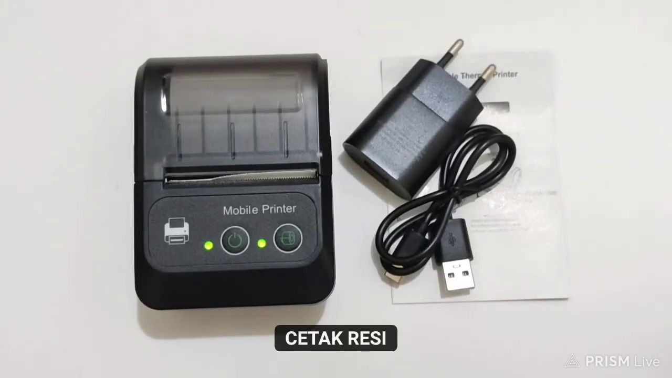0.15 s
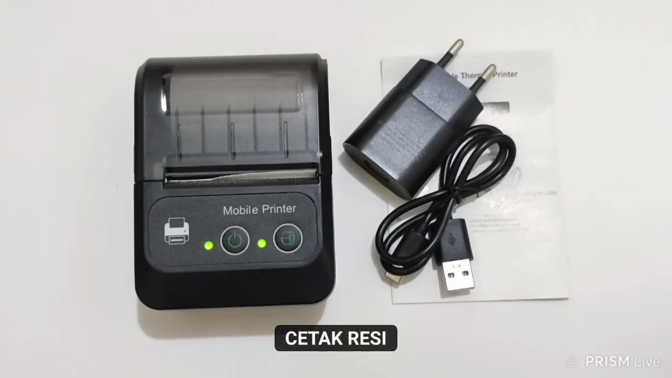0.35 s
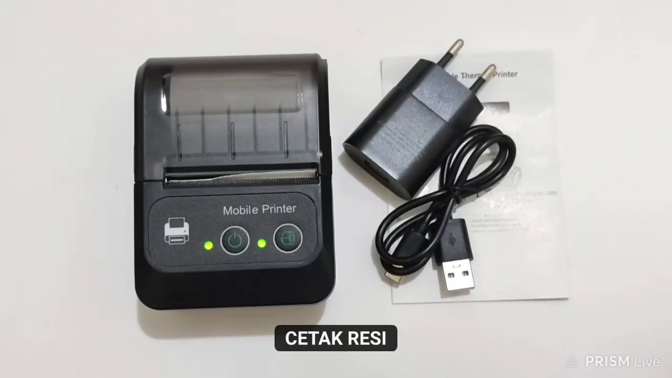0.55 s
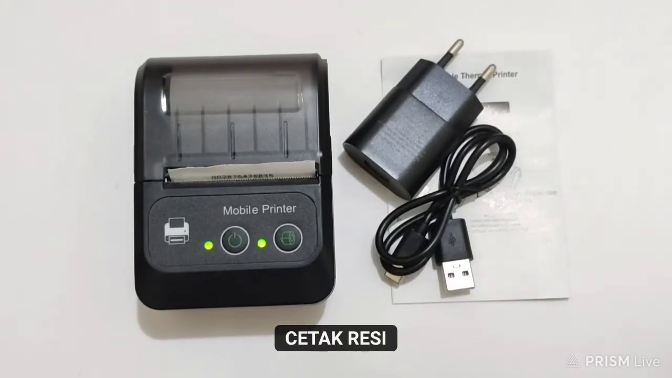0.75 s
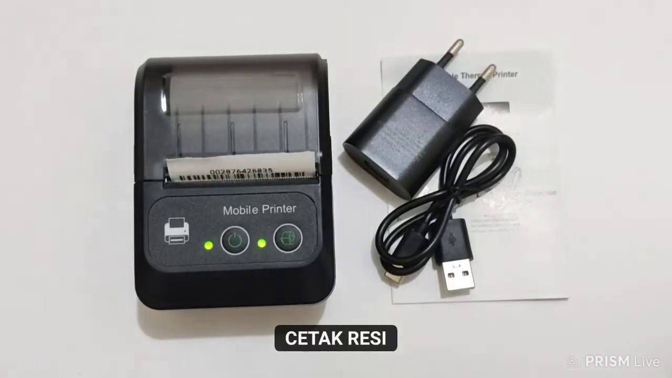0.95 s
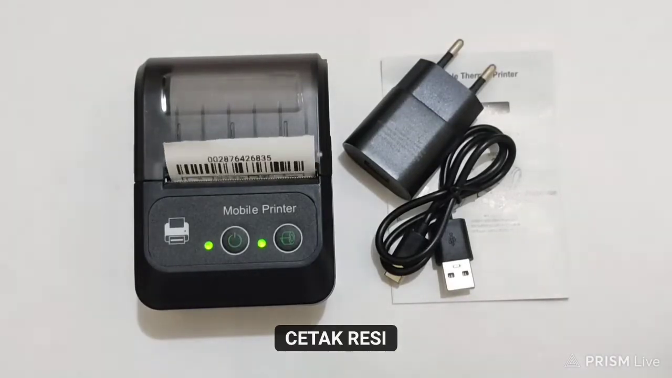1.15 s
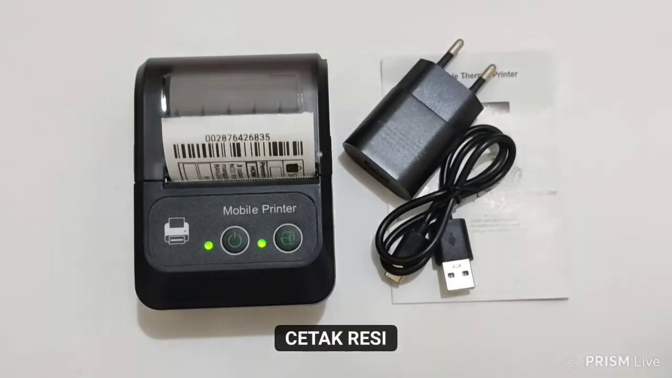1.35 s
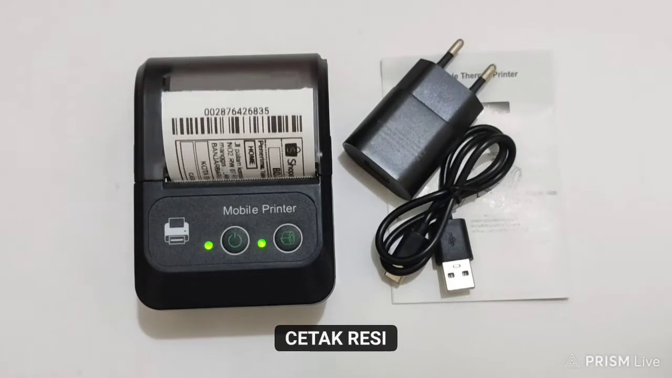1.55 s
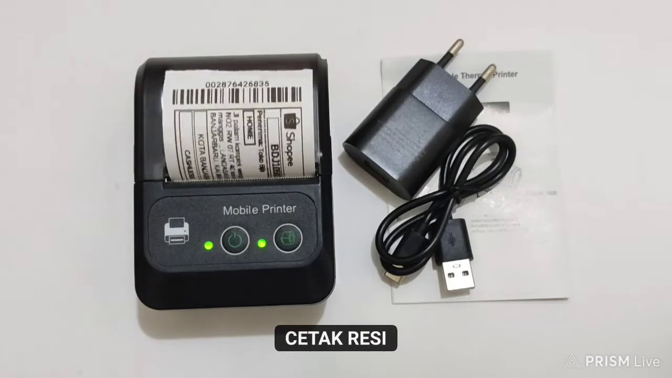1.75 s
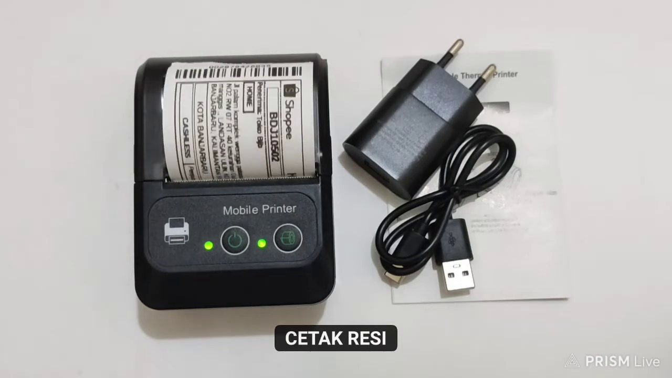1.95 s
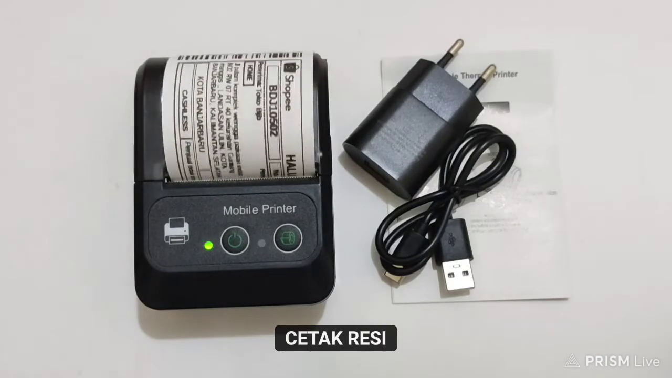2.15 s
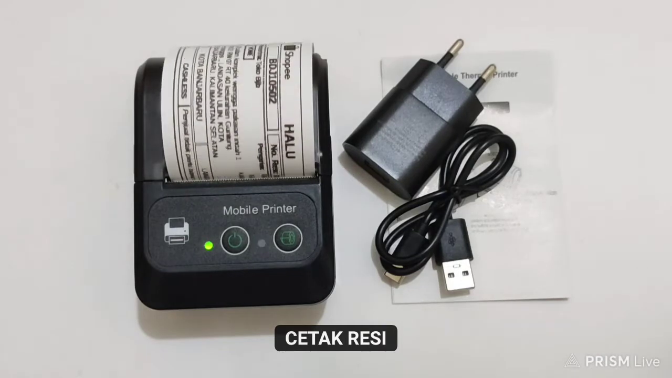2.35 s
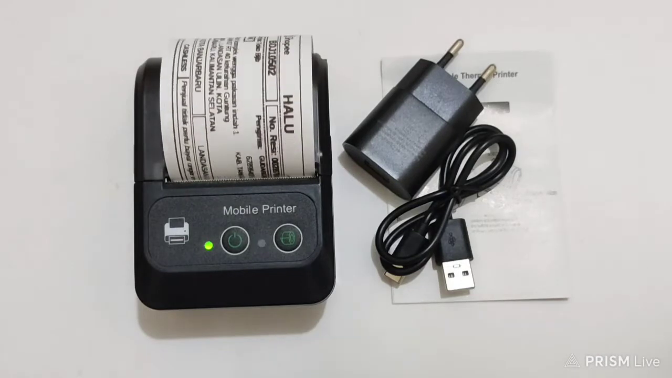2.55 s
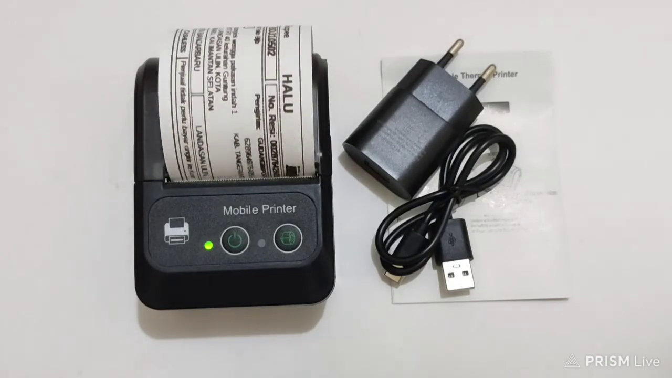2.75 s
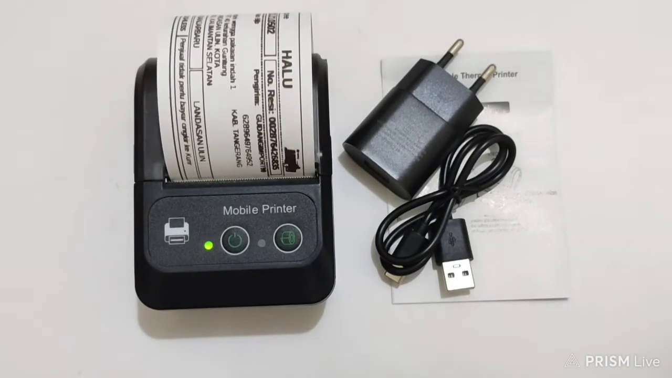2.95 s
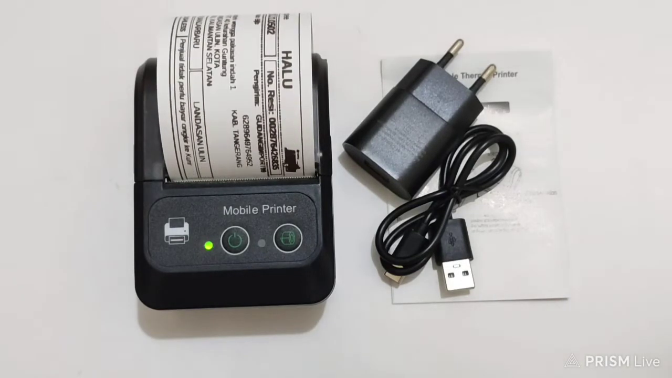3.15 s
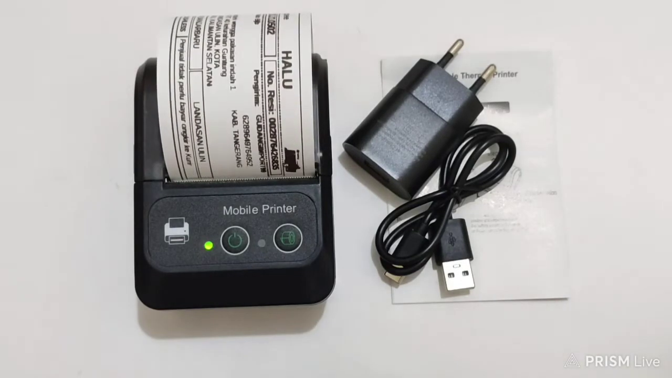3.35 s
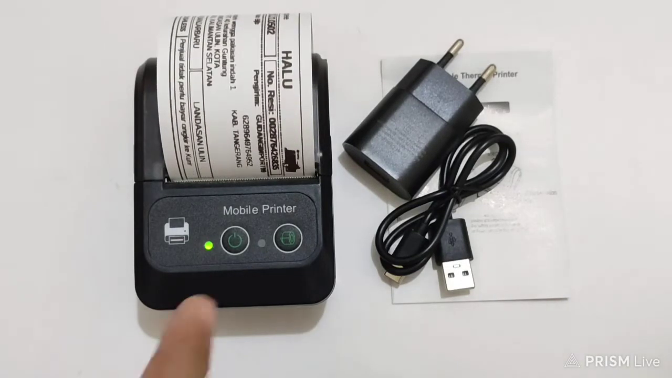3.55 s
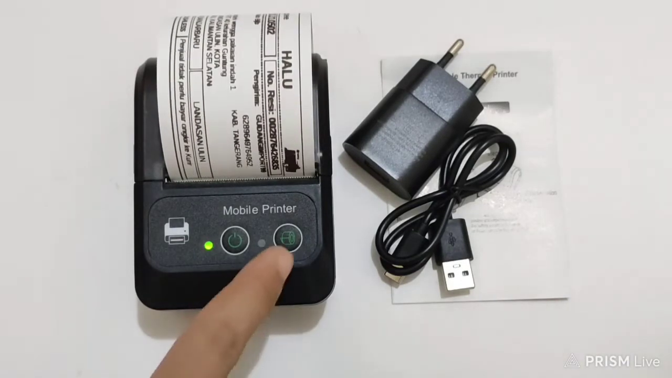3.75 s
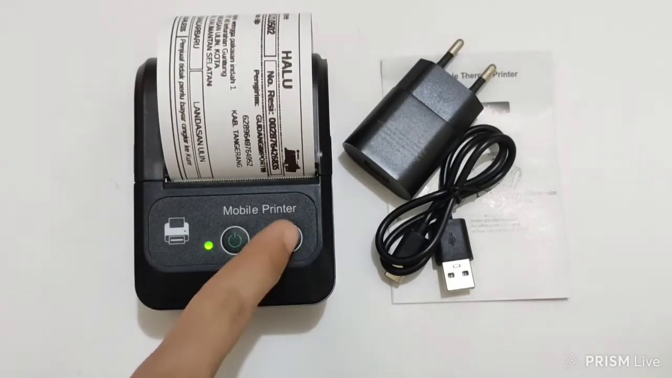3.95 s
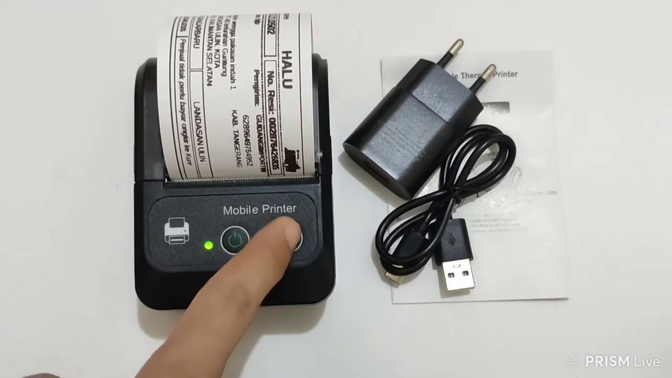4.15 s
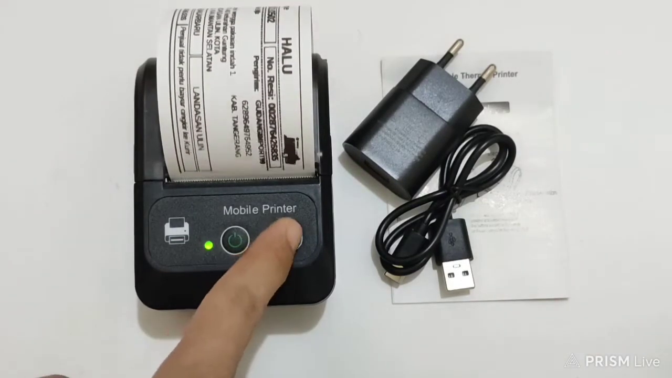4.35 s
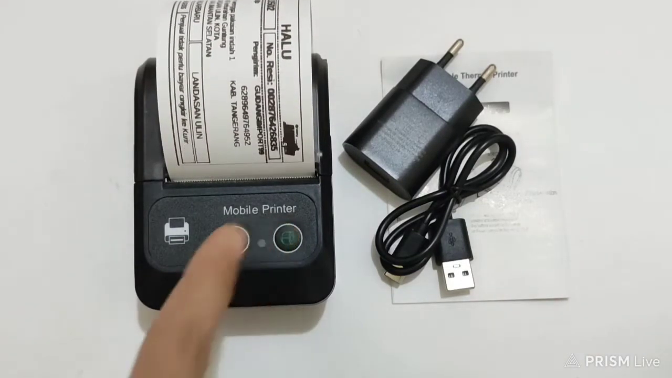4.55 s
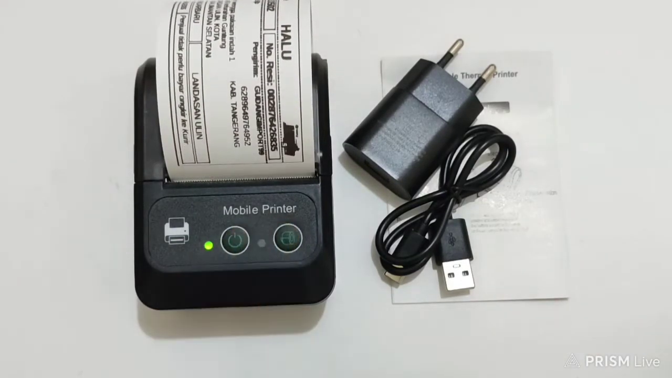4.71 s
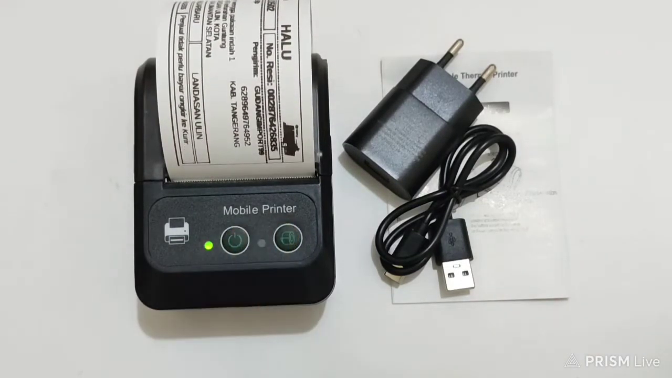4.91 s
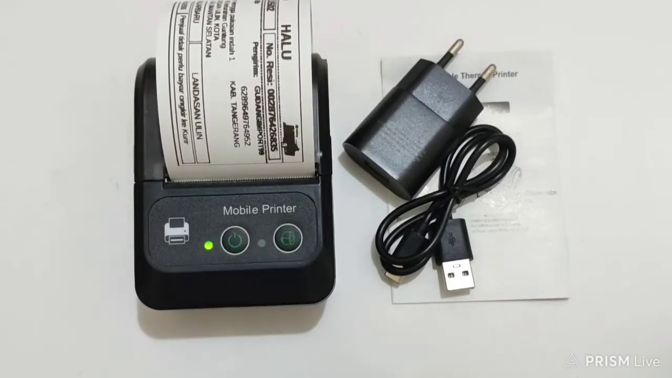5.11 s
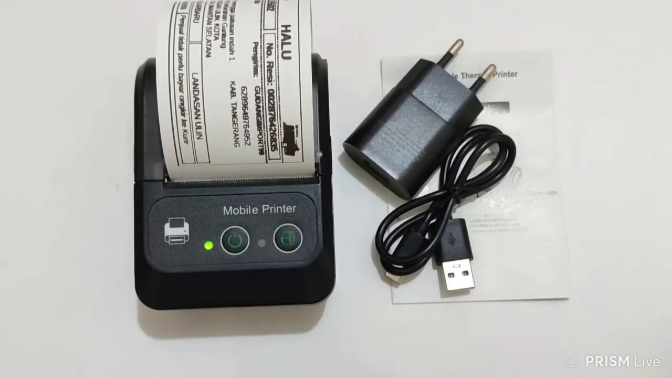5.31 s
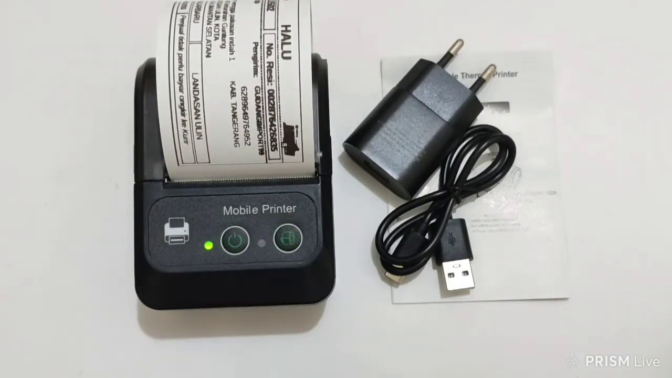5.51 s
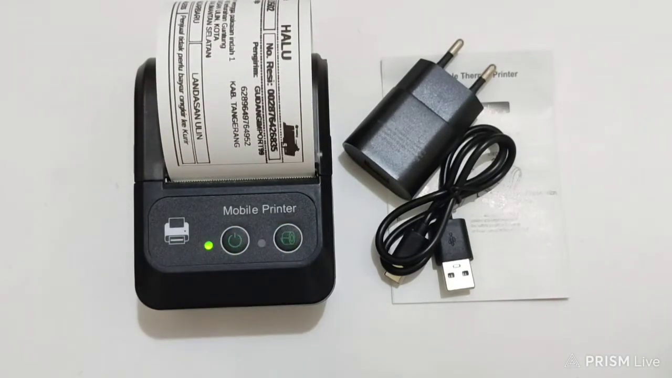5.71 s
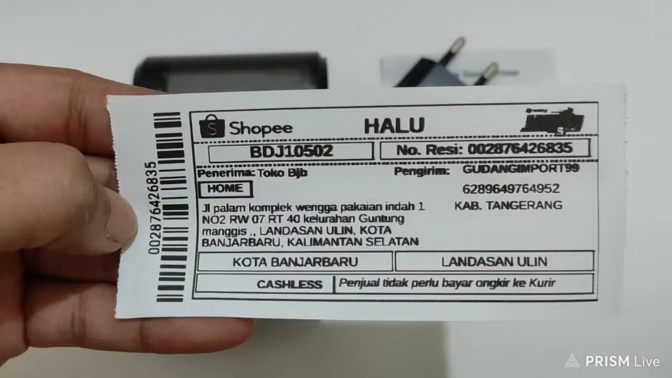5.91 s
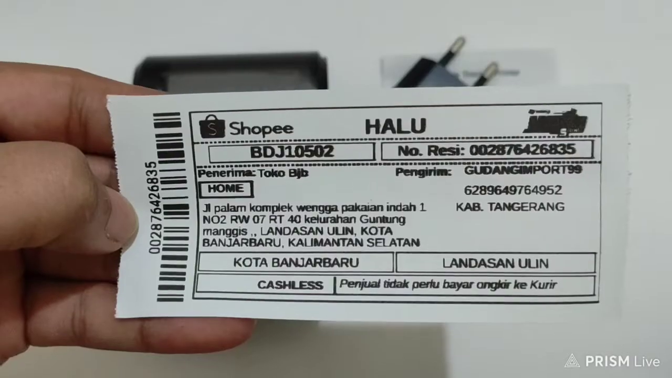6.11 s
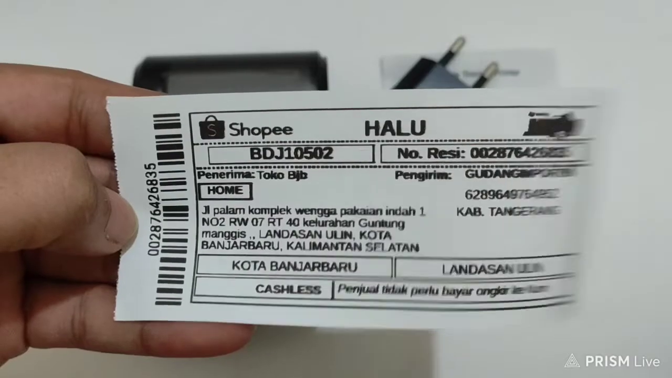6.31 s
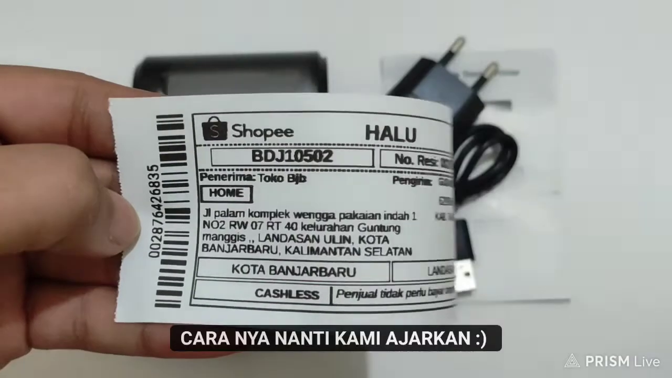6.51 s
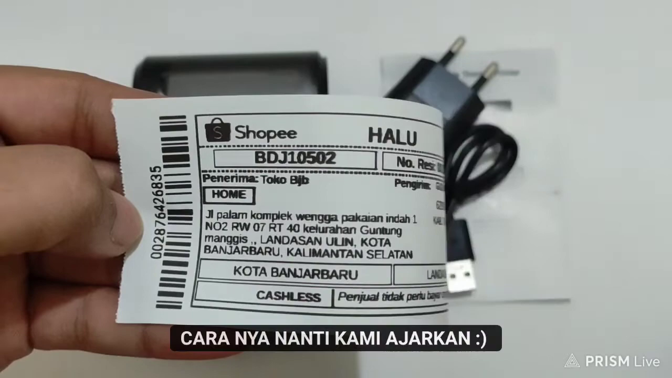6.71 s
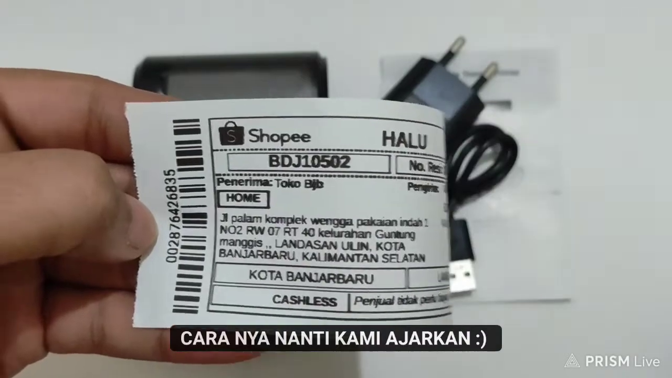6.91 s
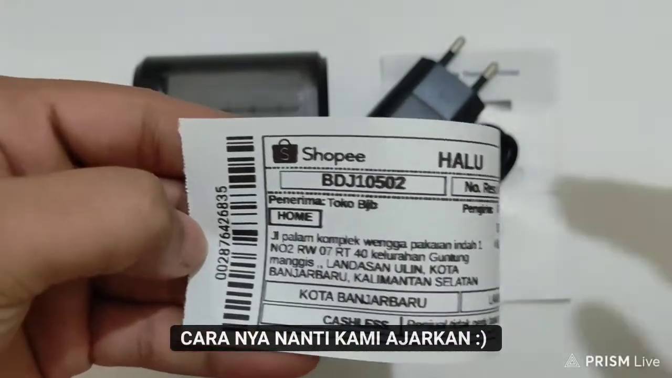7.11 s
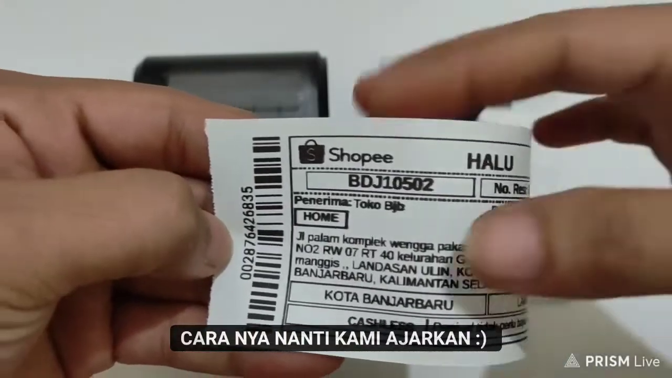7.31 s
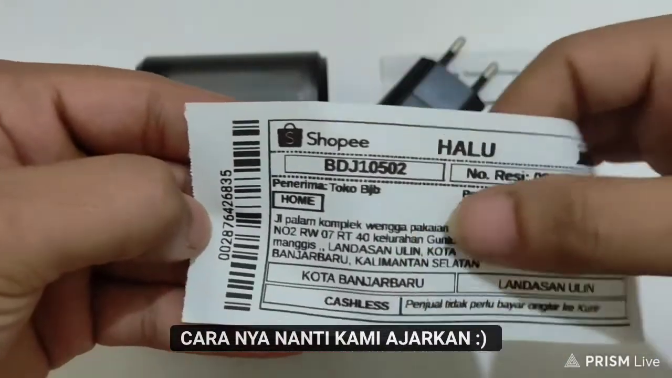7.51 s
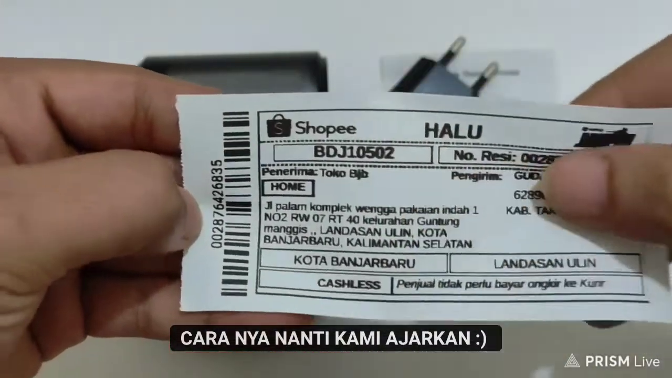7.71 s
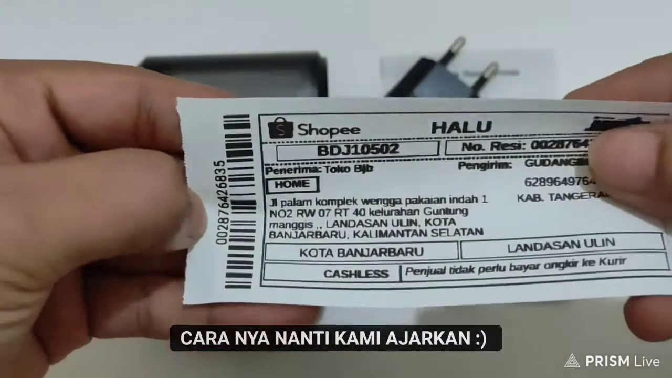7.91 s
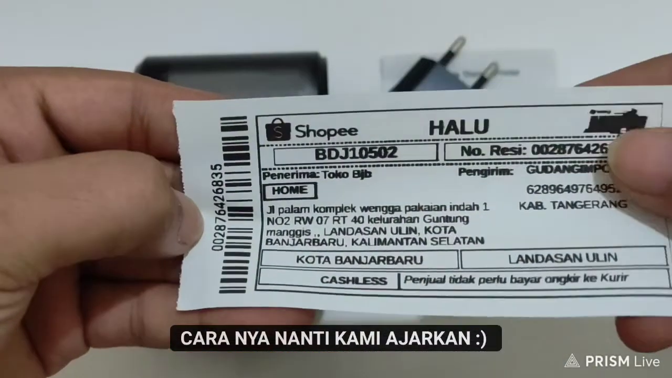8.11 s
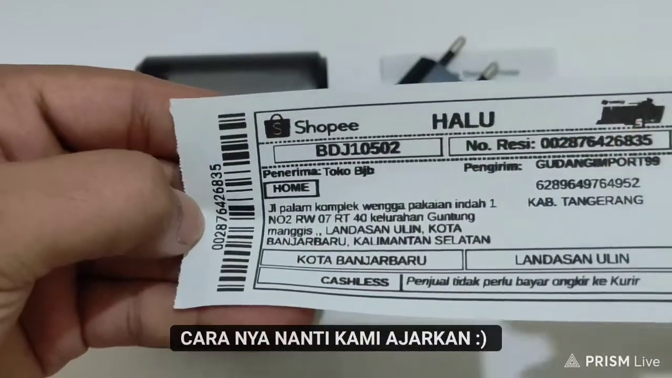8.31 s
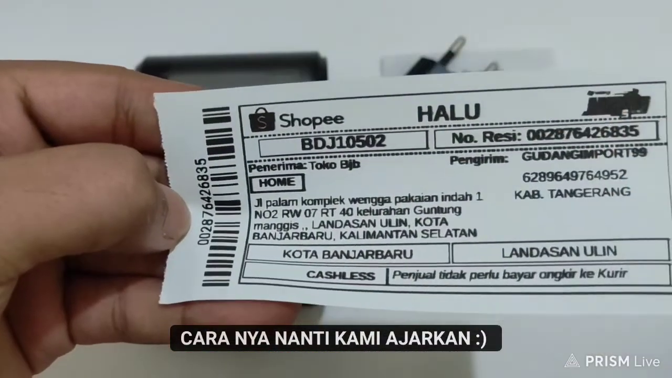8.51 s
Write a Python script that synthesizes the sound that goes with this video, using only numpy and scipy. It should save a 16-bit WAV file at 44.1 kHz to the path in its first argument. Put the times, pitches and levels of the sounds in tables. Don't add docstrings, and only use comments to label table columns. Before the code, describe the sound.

A small thermal printer clacks and buzzes out a paper label, its button clicks a brief feed, then paper rustles and snaps taut sharply.

```python
import sys
import numpy as np
from scipy import signal
from scipy.fft import rfft, irfft, next_fast_len
from scipy.io import wavfile
from scipy.ndimage import uniform_filter1d, map_coordinates

SR = 44100
rng = np.random.default_rng(int(sys.argv[2]) if len(sys.argv) > 2 else 0)


def digitize_waveform(pressure):
    field = np.atleast_2d(pressure).T
    bounded = np.clip(field, -1, 1)
    quanta = np.round(bounded * 32767).astype(np.int16)
    wavfile.write(sys.argv[1], SR, quanta)


def attenuation_scalar(level_db):
    decades = np.asarray(level_db, float) / 20
    return 10 ** decades


N = 381856

# start_s, pace_steps_per_s, unevenness_0_to_1
STRETCHES = [(.64, 80, .001), (1.055, 203, .009), (1.18, 167, .025), (1.345, 238, .2), (1.71, 258, .06),
             (1.78, 241, .02), (2.052, 222, .03), (2.095, 243, .021), (2.59, 178, .06), (2.7, 212, .07),
             (2.775, 243, .014), (2.885, 249, .005), (4.2, 205, .05), (4.345, 250, .012)]
# start_s, rise_s, hold_s, hum_db
RUNS = [
    (.66, 0.0088, 2.284, -51),
    (4.31, 0.018, 0.13, -50.5),
]
# start_s, hum_db, gear_db, hiss_db, t60_s
JERKS = [
    (0.647, -83, -42, -34, 0.07),
    (.668, -56, -52, -57, 0.14),
    (.704, -30.5, -57, -25.5, 0.041),
    (1.043, -70, -45, -50, 0.15),
    (2.06, -45, -64, -64, 0.13),
    (2.93, -46, -74, -81, 0.29),
    (4.475, -40.5, -43.5, -70, 0.098),
]
# centre_hz, width_hz, level_db
SHELL_MODES = [(240, 60, -12), (325, 70, -4), (485, 60, -2.5), (565, 60, 2), (735, 110, 1), (1000, 160, -5),
               (1240, 160, -6.5), (1480, 200, -7), (1750, 120, -9), (1965, 120, -10)]
# centre_hz, width_hz, level_db
GEAR_MODES = [(2520, 590, 3.5), (2780, 210, 3.5), (3920, 150, 4), (4560, 200, -2), (4860, 130, 1),
              (5850, 300, 0), (5480, 300, -1), (6640, 450, -10)]
# freq_hz, level_db_per_hz
RUMBLE = [(120, -36), (250, -40), (500, -9.5), (800, -10), (1600, -12), (2200, -13.5), (2800, -10),
          (4500, -16), (6000, -23), (7500, -32), (10000, -86)]
# freq_hz, level_db_per_hz
HISS = [(3530, -18), (6000, -7), (7070, -17.5), (7710, -17), (8750, -7), (9540, -7), (12100, -9),
        (14300, -23), (16000, -7.5)]
# start_s, end_s, centre_hz, width_hz, gain_db
RINGS = [(.6, 1.07, 560, 40, 4), (.6, 1.07, 320, 30, 3), (1.17, 1.34, 500, 40, 4),
         (1.17, 1.34, 670, 50, -4), (1.8, 2.6, 487, 30, 3), (.75, 1.5, 3250, 300, 4),
         (.6, 1.1, 1200, 350, 3), (1.07, 1.17, 640, 90, 1), (.6, 1.1, 740, 90, -5), (2.8, 3.0, 248, 30, 6),
         (1.7, 2.4, 3880, 60, 4), (1.6, 2.1, 4560, 250, 3), (2.0, 2.55, 2830, 35, 7),
         (2.1, 2.62, 2700, 40, 5), (2.6, 3.0, 2560, 60, 5), (1.8, 3.0, 1960, 35, 5),
         (2.75, 3.0, 4540, 170, 4), (1.9, 3.0, 5690, 90, 3), (2.12, 2.6, 735, 70, 2),
         (4.2, 4.6, 750, 50, -2), (4.3, 4.5, 2720, 120, 4), (4.3, 4.5, 1260, 60, 3)]
# time_s, centre_hz, width_hz, depth_db
SHADE = [(.9, 3100, 500, 6), (1.3, 2740, 550, 22), (1.551, 2650, 450, 30), (1.8, 2520, 300, 27),
         (2.2, 2280, 200, 15), (2.5, 2240, 180, 16), (2.9, 2100, 150, -3), (4.3, 2400, 300, 4)]
# start_s, thud_peak_db, crack_db, t60_s
KNOCKS = [(0.648, -46, 9.5, 0.025), (0.661, -38.5, -7, 0.018), (0.674, -42, -17, 0.012),
          (0.681, -27, -1.5, 0.017), (0.694, -39, -10, 0.011), (0.697, -34, -9, 0.01),
          (0.704, -22, 2, 0.02), (0.724, -58, -7, 0.016), (0.74, -32, -22, 0.02),
          (2.942, -35.5, -10, 0.035), (4.247, -34, -5, 0.02), (4.257, -41.5, -8, 0.023),
          (4.283, -45, -12, 0.03), (4.316, -41, -5, 0.027), (4.475, -29.5, -22, 0.029),
          (4.489, -40, -8, 0.016)]
# centre_hz, width_hz, level_db
LID_MODES = [(622, 83, 4.5), (797, 114, 9), (1176, 95, 7), (1357, 105, 3.5), (1990, 220, -3.5)]
# freq_hz, level_db_per_hz
CLICK = [(900, -39), (1800, -19), (2600, 5), (3300, 8.5), (4000, 5.5), (5800, -2.5), (8000, -1),
         (11000, -7), (14000, -9), (16000, -7.5)]
# start_s, rise_s, hold_s, level_db
CREEPS = [
    (3.03, 0.12, 0.15, -66),
    (3.42, 0.059, .1, -88),
    (3.58, 0.017, .03, -75.5),
    (3.73, .036, .002, -86),
]
# freq_hz, level_db_per_hz
CREEP_RUSTLE = [(710, -18), (1200, 3), (1250, -5), (1500, 2), (1890, -8), (3490, -2.5), (6650, -8),
                (7230, -22), (8660, -4), (15000, -14)]
# start_s, start_hz, level_db
SQUEAKS = [
    (3.612, 10900, -66),
    (3.64, 10200, -80),
    (3.666, 11000, -69),
    (3.7, 10600, -67),
    (3.765, 10300, -76),
]
# start_s, thud_peak_db, crack_db, t60_s
BUMP = [
    (6.302, -38.5, -30, 0.03),
    (6.312, -43.5, -16.5, 0.04),
    (6.322, -52, -14, 0.027),
]
# centre_hz, width_hz, level_db
DESK_MODES = [(250, 100, 0), (614, 140, 5), (800, 96, 9), (1570, 310, -0.5), (2330, 200, -4.5),
              (3460, 300, -5)]
# start_s, thud_peak_db, crack_db, t60_s
FLICKS = [(7.364, -42.5, -13.5, 0.014), (7.371, -51, 0, 0.021), (7.391, -48, 1, 0.018),
          (7.399, -52, 4, 0.02), (7.41, -38, -7, 0.016), (7.446, -44, -25, 0.02), (7.449, -38, -25, 0.018),
          (7.4556, -46, -6, 0.01), (7.581, -42, 8.5, 0.008), (7.521, -49, 8, .005), (7.547, -48.5, 6, .005),
          (7.566, -48, 6.5, .005), (7.586, -31, 0.5, 0.019), (7.595, -45, -9.5, 0.013),
          (7.61, -30, -19, 0.023), (7.621, -37.5, -9, 0.018), (7.897, -48, -5, 0.01),
          (7.911, -45, -20, 0.01), (7.951, -59, -11, 0.016), (7.992, -43, -8, 0.012),
          (8.007, -50, -13, 0.012), (8.077, -45, -25, 0.017), (8.154, -44.5, -30.5, 0.034),
          (8.163, -54, -29, 0.02)]
# centre_hz, width_hz, level_db
SLACK_MODES = [(313, 140, 7.5), (640, 450, 6.5), (960, 360, 4), (1640, 370, -4.5)]
# start_s, thud_peak_db, crack_db, t60_s
PULL = [
    (7.7555, -35, -16, .05),
    (7.7598, -24, -10, .008),
    (7.7609, -7, -8, .01),
    (7.7622, -20, 5, .012),
    (7.7662, -20, -12, .012),
]
# centre_hz, width_hz, level_db
TAUT_MODES = [(850, 810, -3.5), (1960, 470, -7.5), (300, 44, -14)]
# freq_hz, level_db_per_hz
SNAP = [(900, -26), (2000, -3.5), (3000, -1), (4500, -7.5), (6000, -1.5), (8000, -11), (10500, -7),
        (13500, -28), (16000, -48)]
# start_s, rise_s, hold_s, rasp_db, flap_over_rasp_db
STROKES = [
    (7.355, 0.051, .005, -51.5, -4),
    (7.388, .004, .05, -55.5, -10),
    (7.451, .004, .04, -45.5, -12),
    (7.472, 0.041, 0.051, -46, -10.5),
    (7.57, 0.0074, 0.034, -52, 1.5),
    (7.652, 0.03, 0.044, -76, 8.5),
    (7.719, 0.028, .01, -56.5, -13.5),
    (7.896, 0.025, 0.035, -71, 0.5),
    (7.977, 0.013, 0.0052, -60.5, -1.5),
    (8.029, 0.032, .005, -61.5, -5.5),
]
# freq_hz, level_db_per_hz
RASP = [(470, -37.5), (800, -6), (1260, -15), (1720, -0.5), (1880, -1.5), (2050, -7.5), (2730, -4.5),
        (6570, -2), (7170, -8.5), (11000, -1.5), (16000, -12.5)]
# freq_hz, level_db_per_hz
FLAP = [(59, -37.5), (100, -10), (378, -1), (479, -8), (811, -9.5), (2000, -20.5), (2600, -59),
        (4400, -120)]
# freq_hz, left_minus_right_db
PORTS = [(100, 2.5), (400, 1), (700, 0.5), (1850, 0.5), (2300, 1), (3250, 2.5), (4000, 5), (4800, 2.5),
         (5800, 2), (7000, 7.5), (8500, 16), (10300, -10), (12400, -10.5), (15000, 4.5)]
# freq_hz, t60_s
WALLS = [(200, 0.4), (1000, 0.36), (5000, 0.41), (12000, 0.37)]
# freq_hz, level_db_per_hz
AIR = [(12, -72), (20, -47.5), (48, -14), (86, -6), (123, -2.5), (187, -5), (293, -7), (434, -9.5),
       (472, -13), (624, -13), (1960, -25), (3250, -27.5), (7520, -34.5), (14700, -33), (16000, -19.5)]
# freq_hz, left_right_likeness
AIR_ALIKE = [(60, 0.51), (240, 0.2), (950, 0.03), (3770, 0.013), (15000, -0.13)]
# freq_hz, left_minus_right_db
AIR_TILT = [(60, 2.5), (380, 1), (2380, 0.5), (15000, 0.0)]


def unit(x):
    return x / np.sqrt(np.mean(x ** 2) + 1e-20)


def along(points, hz):
    f, v = np.transpose(points)
    return np.interp(np.log(hz + 1), np.log(f + 1), v)


def wobble(rate):
    coarse = np.arange(0, N + 8, 8)
    knots = rng.standard_normal(int(N * rate / SR) + 4)
    return np.interp(np.arange(N), coarse, map_coordinates(knots, [coarse * rate / SR]))


def filtered(x, response):
    m = next_fast_len(N + SR // 4)
    return irfft(rfft(x, m) * response(np.fft.rfftfreq(m, 1 / SR)), m)[..., :N]


def tinted(x, spectrum):
    return unit(filtered(x, lambda hz: attenuation_scalar(along(spectrum, hz))))


def body(modes):
    def response(f):
        return sum((-1) ** k * attenuation_scalar(db) * 1j * f * w / (c * c - f * f + 1j * f * w)
                   for k, (c, w, db) in enumerate(modes))
    return response


def swells(rows, fall_db_per_s):
    rise_db = 20.5
    t, power = np.arange(N) / SR, np.zeros(N)
    for s, rise, hold, db in rows:
        a = round(s * SR)
        u = t[a:a + 3 * SR] - s
        rising = rise_db * np.clip(1 - u / rise, 0, 1)
        falling = fall_db_per_s * np.maximum(u - rise - hold, 0)
        power[a:a + 3 * SR] += attenuation_scalar(2 * (db - rising - falling))
    return np.sqrt(power)


def reshaped(x, gain_db):
    end = 5 * SR
    hz, t, z = signal.stft(x[..., :end], SR, nperseg=2048)
    head = signal.istft(z * attenuation_scalar(gain_db(hz[:, None], t)), SR, nperseg=2048)[1][..., :end]
    return np.concatenate([head, x[..., end:]], axis=-1)


def schedule():
    glide_s = .03
    s, *cols = np.transpose(STRETCHES)
    now = np.maximum(np.searchsorted(s, np.arange(N) / SR) - 1, 0)
    return [uniform_filter1d(c[now], round(glide_s * SR)) for c in cols]


def drive(pace, uneven):
    inertia_s, full_pace = .07, 240
    crawl_octaves = -0.57
    lag = lambda v: uniform_filter1d(v, round(inertia_s * SR))
    octaves = lag(np.log2(pace / full_pace))
    loss_db = 2.5 * lag(uneven)
    on = swells(RUNS, fall_db_per_s=800)
    short = np.exp(-np.cumsum(pace * (on > 0)) / SR / 110)
    rubbing = np.maximum(octaves, crawl_octaves)
    laws = [0.95 * octaves - loss_db / 2,
            3 + 11 * rubbing - loss_db - 6 * short,
            -2.5 + 6.5 * rubbing - loss_db / 2 - 3 * short]
    power, t = (on * attenuation_scalar(laws)) ** 2, np.arange(SR // 4) / SR
    for s, *dbs, t60 in JERKS:
        fading = attenuation_scalar(2 * (np.array(dbs)[:, None] - 60 * t / t60))
        power[:, round(s * SR):][:, :len(t)] += fading * np.minimum(t / 0.015, 1)
    return np.sqrt(power)


def ringing(hz, t):
    return sum(db * np.exp(-((hz - c) / w) ** 2) * np.clip(np.minimum(t - a, b - t) / .1 + .5, 0, 1)
               for a, b, c, w, db in RINGS)


def squeal():
    start_s, length_s, hz, width_hz, db = 0.648, 0.013, 5800, 500, -43
    t = np.arange(N) / SR
    scrape = unit(filtered(rng.standard_normal(N), body([(hz, width_hz, 0)])))
    return attenuation_scalar(db) * scrape * ((t > start_s) & (t < start_s + length_s))


def motor():
    rattle_s = .0031
    pace, uneven = schedule()
    hop = np.minimum(uneven, .013) * np.tanh(2 * wobble(22))
    stumble = np.maximum(uneven - .02, 0) * wobble(70)
    turns = np.cumsum(pace * (1 + hop + stumble)) / SR
    at = np.flatnonzero(np.diff(np.floor(turns)))
    kicks = np.zeros(N)
    kicks[at] = attenuation_scalar(1.1 * rng.standard_normal(N)[at]) / np.sqrt(pace[at] / SR)
    kicks *= (1 - 2.2 * uneven) * (240 / pace) ** .3
    kicks = filtered(kicks, lambda f: np.exp(1.6j * np.sin(2 * np.pi * f * rattle_s)))
    breath = (1 + .5 * np.cos(2 * np.pi * turns - 1.2)) * attenuation_scalar(.8 * wobble(21))
    rub = lambda: unit(breath * rng.standard_normal(N))
    hum_g, gear_g, hiss_g = drive(pace, uneven)
    low = lambda f: 1 / (1 + (f / 2200) ** 6)
    hum = attenuation_scalar(-1.5) * unit(filtered(kicks, body(SHELL_MODES)))
    hum += attenuation_scalar(-3.5) * unit(filtered(tinted(rub(), RUMBLE), low))
    cog_g = attenuation_scalar(-8.5 + 1.8 * wobble(45)) * (pace > 120) * (1 - 3 * uneven)
    hum += cog_g * np.cos(2 * np.pi * 3 * turns + 1.0 * wobble(60))
    gear = attenuation_scalar(-12.0) * unit(filtered(kicks, body(GEAR_MODES)))
    gear += attenuation_scalar(-6.0) * unit(filtered(rub(), body(GEAR_MODES)))
    gear += attenuation_scalar(-1.0) * unit(filtered(tinted(rub(), RUMBLE), lambda f: 1 - low(f)))
    hum = reshaped(hum_g * hum, ringing)
    gear = reshaped(attenuation_scalar(2.0) * gear_g * gear, ringing) + squeal()
    hiss = attenuation_scalar(1.0) * hiss_g * tinted(rub(), HISS)
    return hum, gear, hiss


def shading(hz, t):
    s, *cols = np.transpose(SHADE)
    centre, width, depth_db = [np.interp(t, s, c) for c in cols]
    share = np.array([1, .7])[:, None, None]
    return -depth_db * np.exp(-((hz - centre) / width) ** 2) * share


def blows(events, modes, crack, push, thud_db, crack_db, alike, low_hz=150):
    dull, bright = np.zeros(N + SR), np.zeros((2, N + SR))
    t = np.arange(4096) / SR
    f = np.fft.rfftfreq(2 * len(t), 1 / SR)
    ring = body(modes)(f) * (1j * f / (low_hz + 1j * f)) ** 2
    turn = np.arccos(np.clip(alike, 0, 1))
    shove = np.hanning(18) / 8
    for s, db, rel_db, t60 in events:
        a = round(s * SR)
        noise = rng.standard_normal((3, len(t))) * attenuation_scalar(-60 * t / max(t60, .002))
        noise[0, :len(shove)] -= push * np.sqrt(t60 * SR) * shove
        noise[2] = np.cos(turn) * noise[1] + np.sin(turn) * noise[2]
        thud = irfft(rfft(noise[0], 2 * len(t)) * ring)[:len(t)]
        dull[a:][:len(t)] += attenuation_scalar(db) * thud / np.abs(thud).max()
        bright[:, a:][:, :len(t)] += attenuation_scalar(db + rel_db) * noise[1:]
    cracks = filtered(bright[:, :N], lambda hz: attenuation_scalar(along(crack, hz)))
    return attenuation_scalar(thud_db) * dull[:N] + attenuation_scalar(crack_db) * cracks


def curl():
    rustle = tinted(rng.standard_normal(N) * attenuation_scalar(2 * wobble(40)), CREEP_RUSTLE)
    out = swells(CREEPS, fall_db_per_s=60) * rustle
    t = np.arange(round(0.01 * SR)) / SR
    for s, hz, db in SQUEAKS:
        glide = hz * (1 + 13 * t + .03 * rng.standard_normal(len(t)))
        squeak = np.hanning(len(t)) * np.sin(2 * np.pi * np.cumsum(glide) / SR)
        out[round(s * SR):][:len(t)] += attenuation_scalar(db) * squeak
    return out


def fingers():
    lift_db_per_s = 301
    rasp_g = swells([row[:4] for row in STROKES], lift_db_per_s)
    flap_g = swells([(*row[:3], row[3] + row[4]) for row in STROKES], lift_db_per_s)
    grains = rng.standard_normal(N) * attenuation_scalar(4.5 * wobble(900) + 1.5 * wobble(77))
    now = np.arange(N)
    delay_s = .0004 + .00025 * np.tanh(wobble(9))
    grains += .3 * np.interp(now - SR * delay_s, now, grains)
    flap = rng.standard_normal(N) * attenuation_scalar(3 * wobble(60))
    return rasp_g * tinted(grains, RASP), flap_g * tinted(flap, FLAP)


def clap(sheet_db, crack_db):
    blow = np.zeros(N)
    blow[round(PULL[2][0] * SR)] = 1
    return filtered(blow, lambda hz: attenuation_scalar(sheet_db) * np.abs(body(TAUT_MODES)(hz))
                    + attenuation_scalar(crack_db + along(SNAP, hz)))


def puff():
    start_s, length_s, peak_db = 7.755, .014, -40
    u = np.clip((np.arange(N) / SR - start_s) / length_s, 0, 1)
    push = attenuation_scalar(peak_db) * np.sin(np.pi * u) ** 2 * np.sin(3 * np.pi * u)
    mode = body([(116, 25, 0)])
    drone = unit(filtered(rng.standard_normal(N), lambda f: mode(f) ** 2))
    return push + swells([(7.8, .05, .3, -68)], fall_db_per_s=30) * drone


def ports(x, lead_s):
    half = lambda hz: along(PORTS, hz) * np.log(10) / 40 + 1j * np.pi * hz * lead_s
    return filtered(x, lambda hz: np.exp([half(hz), -half(hz)]))


def tilt(x, difference):
    return filtered(x, lambda hz: attenuation_scalar(np.array([.5, -.5])[:, None] * along(difference, hz)))


def room(x):
    wet, hop = np.zeros((2, N + 3 * SR)), SR // 2
    fade = np.hanning(2 * hop + 1)[:-1]
    x = np.pad(x, (hop, 2 * hop))
    for a in range(0, N + hop, hop):
        hz, t, z = signal.stft(rng.standard_normal((2, SR // 2)), SR, nperseg=256)
        decay = attenuation_scalar(-60 * t / along(WALLS, hz)[:, None])
        tail = signal.istft(z * decay, SR, nperseg=256)[1]
        tail = tail / np.linalg.norm(tail[0])
        answer = signal.fftconvolve((fade * x[a:a + 2 * hop])[None], tail, axes=1)
        wet[:, a:a + answer.shape[1]] += answer
    late = round(.004 * SR)
    return tilt(wet[:, hop - late:][:, :N], PORTS)


def air():
    def mid_side(hz):
        turn = np.arccos(np.clip(along(AIR_ALIKE, hz), -1, 1)) / 2
        return attenuation_scalar(along(AIR, hz)) * [np.cos(turn), np.sin(turn)]
    mid, side = filtered(rng.standard_normal((2, N)), mid_side)
    pair = tilt(np.array([mid + side, mid - side]), AIR_TILT)
    return attenuation_scalar(-64 + 3.5 + 0.53 * wobble(2.42)) * unit(pair)


def scene():
    hum, gear, hiss = motor()
    knocks = blows(KNOCKS, LID_MODES, CLICK, push=0.75, thud_db=1.0, crack_db=3.0, alike=0.67)
    knocks += blows(BUMP, DESK_MODES, SNAP, push=0.72, thud_db=2.0, crack_db=13.5, alike=0.16)
    flicks = blows(FLICKS, SLACK_MODES, SNAP, push=0.14, thud_db=-4.5, crack_db=4.5, alike=0.18)
    snap = blows(PULL, TAUT_MODES, SNAP, push=3, thud_db=-1, crack_db=6, alike=.2, low_hz=90)
    rasp, flap = fingers()
    creep = curl()
    printer = hum + gear + attenuation_scalar(-4.5) * hiss + knocks + creep
    near = attenuation_scalar(-3.5) * reshaped(ports(printer, lead_s=0.000152), shading)
    near += ports(flicks + snap + flap + attenuation_scalar(-5.5) * rasp, lead_s=.00001)
    wet = attenuation_scalar(-3.5) * hiss + attenuation_scalar(-0.5) * creep
    wet += attenuation_scalar(-8) * flicks[0] + clap(sheet_db=15, crack_db=3)
    wet += attenuation_scalar(-2.0) * rasp + attenuation_scalar(-6.5) * flap
    hollow = lambda hz: 1 - .84 * np.exp(-((hz - 3280) / 420) ** 2)
    wet += attenuation_scalar(-9) * hum + attenuation_scalar(-7) * filtered(gear + attenuation_scalar(2.5) * knocks[0], hollow)
    return near + room(wet) + air() + puff()


def band_limit(x):
    return signal.sosfilt(signal.butter(12, 16490, fs=SR, output="sos"), x)


def record(dry):
    mix = filtered(dry, lambda hz: 1 / (1 + (hz / 15500) ** 60))
    return band_limit(mix)


dry = scene()
out = record(dry)
digitize_waveform(out)
```